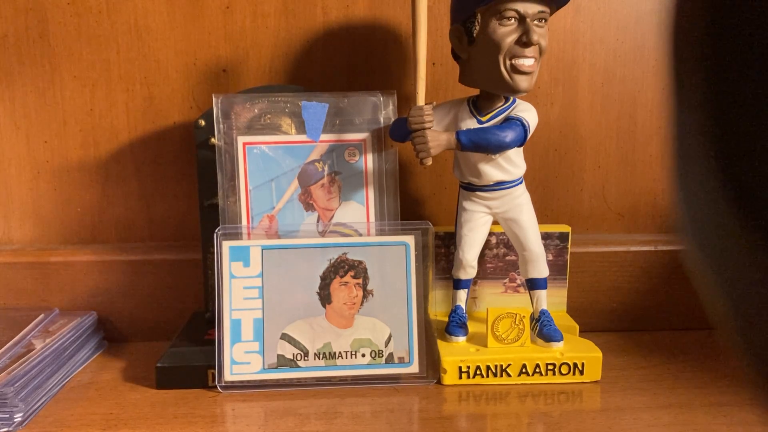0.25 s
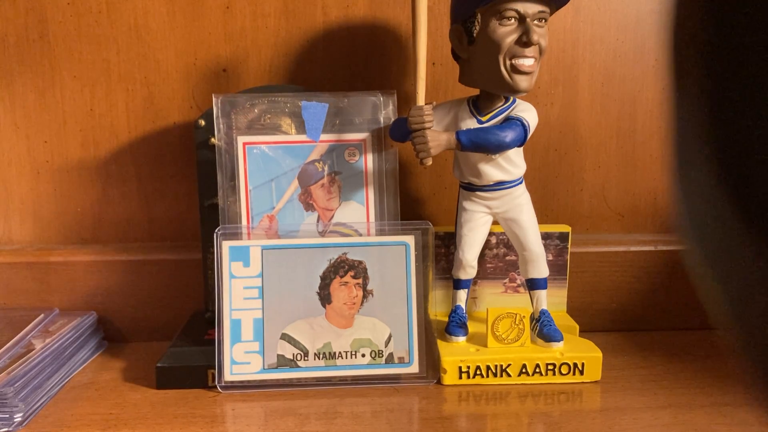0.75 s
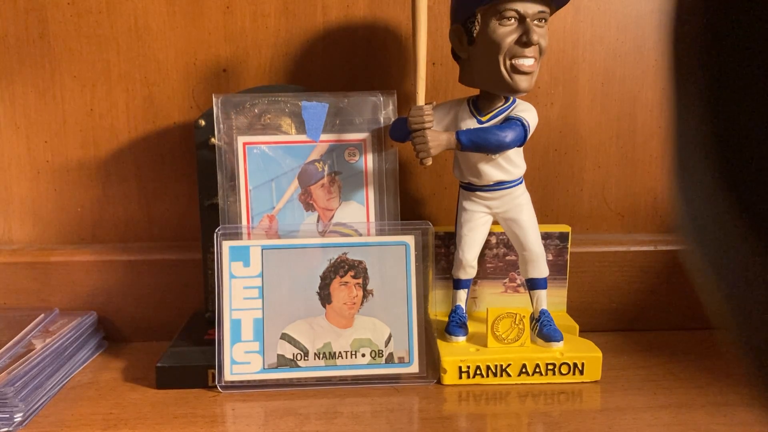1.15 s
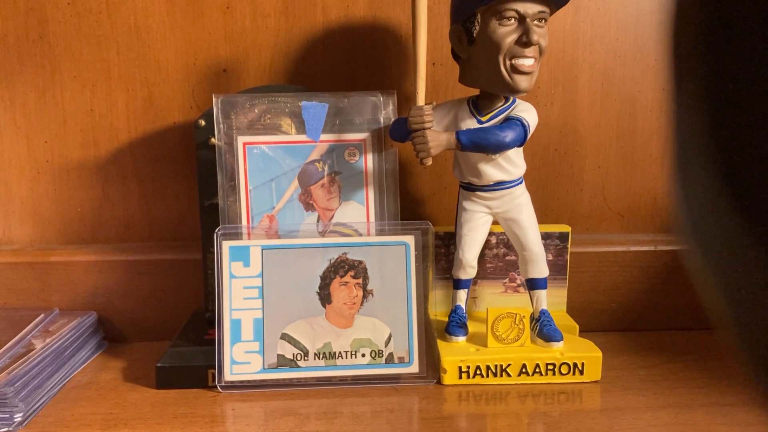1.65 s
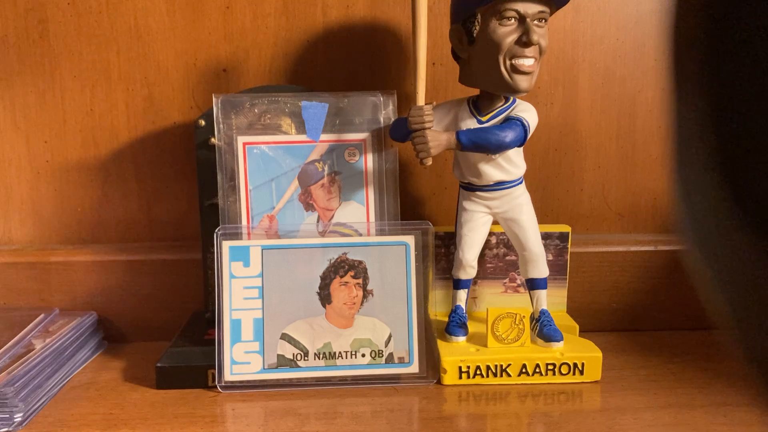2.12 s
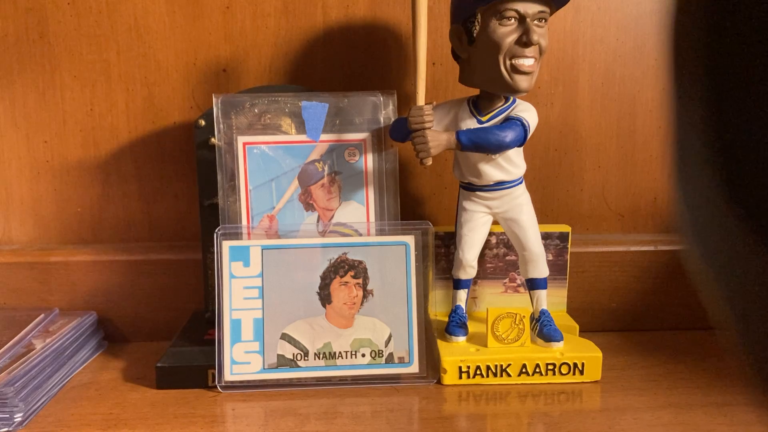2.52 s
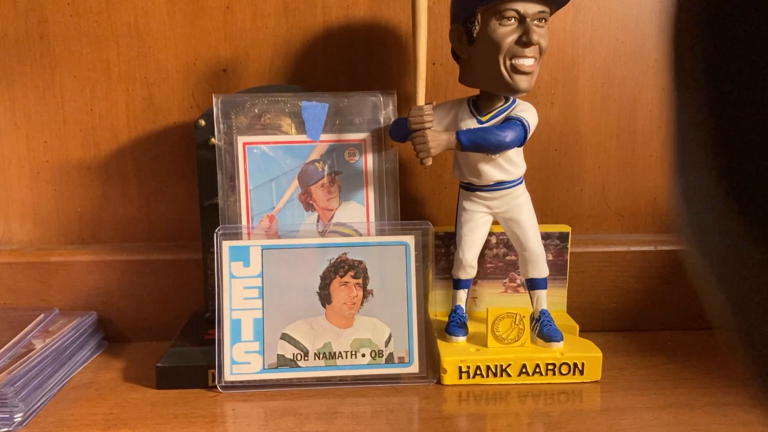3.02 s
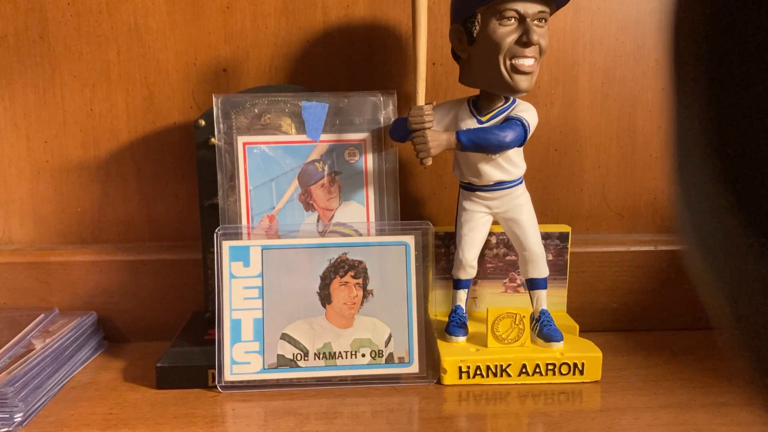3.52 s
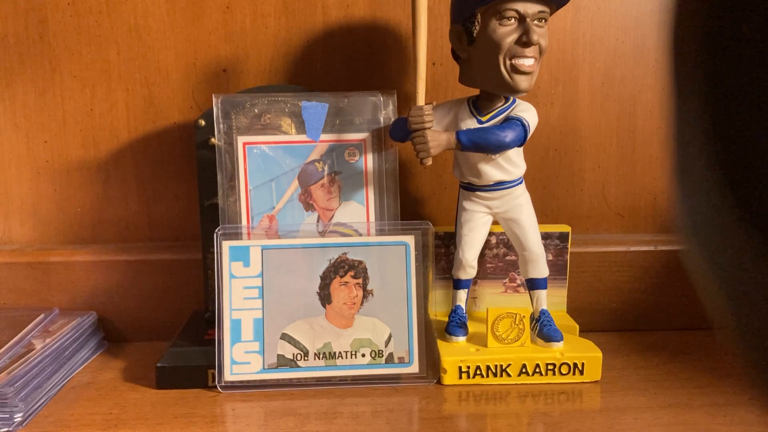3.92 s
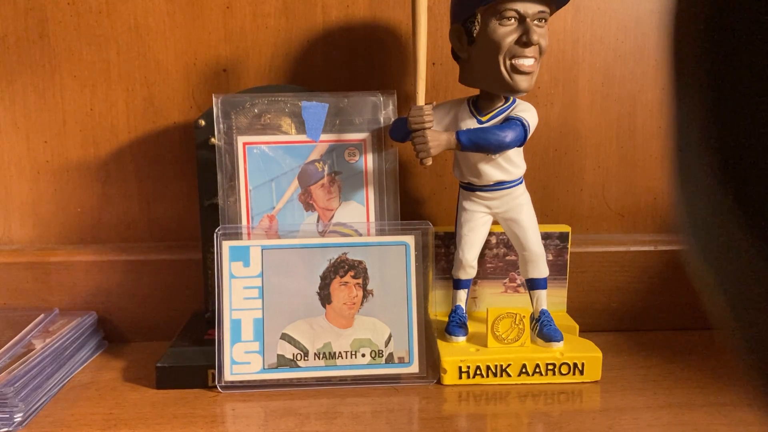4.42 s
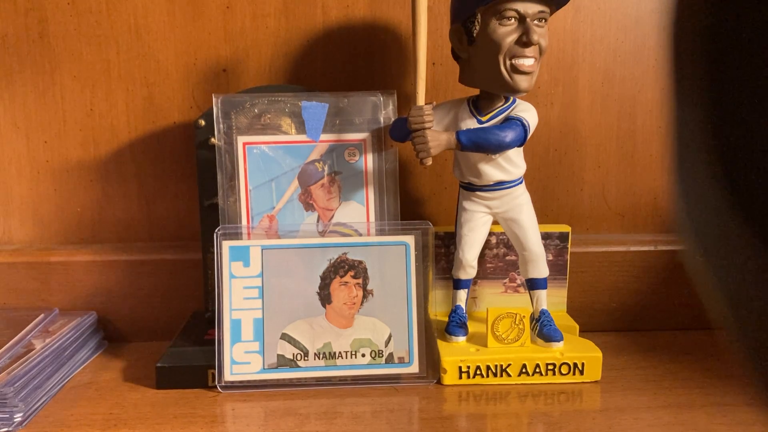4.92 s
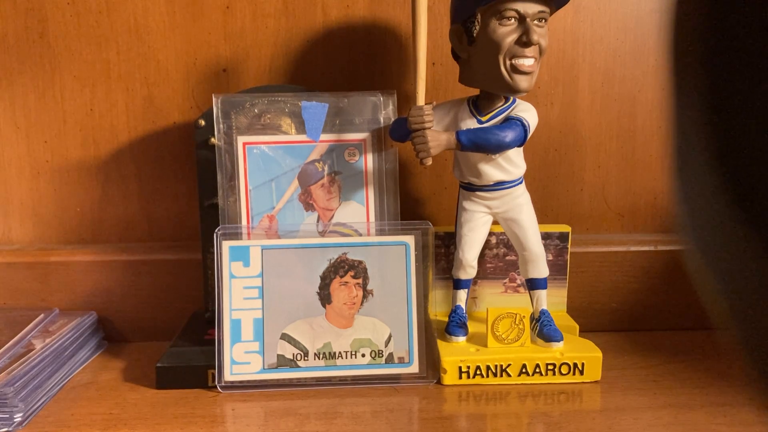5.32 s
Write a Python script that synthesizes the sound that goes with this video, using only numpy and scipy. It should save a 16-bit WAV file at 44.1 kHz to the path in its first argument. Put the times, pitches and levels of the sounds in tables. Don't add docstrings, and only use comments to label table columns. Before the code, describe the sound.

A quiet indoor room with a continuous low ventilation rumble around 50 Hz, uneven soft surges, airy duct rush, light hiss and faint mains hum. Very close to a stereo phone, a card is worked into plastic. From 0 to 0.4 s the film rustles lightly; bright, dry scrapes tighten into the loudest sharp snap at about 0.45 s, followed by hard clicks at 0.63 and 0.68 s and a duller one near 0.9 s. Soft film sliding fades after 1.1 s. A lull holds one light tick and brush around 1.75 s. Two small snaps come at 2.3 s, then a firm push at 2.75-2.85 s: crackling film, clustered clicks and a low holder thump, with rubbing until a tap at 3.14 s. Afterwards there are only faint rubs and ticks, near 3.55, 4.0, 4.3 and 4.6 s, a clear last tap at 4.93 s, a weak one at 5.1 s, and room hum to about 5.6 s.

```python
import sys
import numpy as np
from scipy import signal
from scipy.fft import rfft, irfft, next_fast_len
from scipy.io import wavfile
from scipy.ndimage import map_coordinates

SR = 44100
rng = np.random.default_rng(int(sys.argv[2]) if len(sys.argv) > 2 else 0)


def boost_factor(decibels):
    exponent = np.asarray(decibels, float) / 20
    return 10 ** exponent


def store_wav(level_fs):
    pcm = np.round(np.clip(np.atleast_2d(level_fs), -1, 1) * 32767)
    wavfile.write(sys.argv[1], SR, pcm.T.astype(np.int16))


N = 245545


def filtered(x, response):
    m = next_fast_len(x.shape[-1] + 8192)
    spectrum = rfft(x, m) * response(np.fft.rfftfreq(m, 1 / SR))
    return irfft(spectrum, m)[..., :x.shape[-1]]


def unit(x):
    return x / np.sqrt(np.mean(x ** 2) + 1e-20)


def along(points, hz):
    f, v = np.transpose(points)
    return np.interp(np.log(hz + 1), np.log(f + 1), v)


def resonant(modes):
    def response(f):
        total = 0
        for k, (center, width, db) in enumerate(modes):
            mode = 1j * f * width / (center * center - f * f + 1j * f * width)
            total = total + (-1) ** k * boost_factor(db) * mode
        return total
    return response


def wobble(rate):
    knots = rng.standard_normal(int(N * rate / SR) + 4)
    return map_coordinates(knots, [np.arange(N) * rate / SR])


def noise():
    return rng.standard_normal((2, N))


# (time [s], length [s], low mode level [dB], upper modes level [dB])
SURGES = [(0.016, 0.069, -52, -52.5), (0.256, 0.13, -56, -74), (0.504, 0.11, -57, -66),
          (0.866, 0.13, -53, -53), (1.11, 0.076, -57.5, -60), (1.428, 0.17, -55, -56.5),
          (1.749, 0.035, -53.5, -49.5), (2.106, 0.16, -60.5, -71), (2.577, 0.15, -49.5, -50.5),
          (3.007, 0.073, -48, -60), (3.197, 0.082, -51, -53.5), (3.51, 0.046, -46, -48.5),
          (3.768, 0.13, -60, -49), (3.955, 0.11, -50, -58), (4.238, 0.11, -48.5, -56),
          (4.66, 0.16, -49, -58.5), (4.933, 0.025, -48, -60), (5.126, 0.057, -48.5, -63),
          (5.263, 0.034, -48, -58), (5.53, 0.046, -51.5, -51)]
# (frequency [Hz], width [Hz], level [dB])
UPPER_MODES = [(69.2, 17.5, -5.5), (102.6, 8, 0), (117.55, 8.5, 0.5), (132.9, 22.4, -4)]
# (frequency [Hz], spectral density [dB per Hz])
DUCT = [(88, -37), (150, 1.5), (163, -8), (200, -10.5), (262, -17), (297, -16), (334, -15), (358, -9),
        (436, -21.5), (495, -11), (625, -13.5), (702, -23), (1330, -29.5), (1600, -38), (2400, -45.5),
        (3120, -73), (5280, -120)]
# (frequency [Hz], spectral density [dB per Hz])
HISS = [(1400, -1.5), (3200, -7), (5500, -13), (12600, -16.5), (13600, -28), (14500, -34), (15000, -27),
        (15600, -46)]
# (frequency [Hz], rms level [dB])
HUM = [(120, -54), (360.2, -63)]


def ventilation():
    t = np.arange(N) / SR
    swell = boost_factor([[-64], [-52]])
    for s, length, low_db, upper_db in SURGES:
        swell = swell + boost_factor([[low_db], [upper_db]]) * np.exp(-((t - s) / length) ** 2)
    low = np.sin(2 * np.pi * 51 * t + 0.9 * wobble(6) + [[0], [1]])
    upper = filtered(noise(), lambda f: resonant(UPPER_MODES)(f) * resonant([(110, 110, 0)])(f))
    modes = swell[0] * unit(low) + swell[1] * unit(upper)

    def duct_response(f):
        return boost_factor(along(DUCT, f)) * (1 + 0.13 * np.abs(resonant([(920, 90, 0)])(f)))

    duct = boost_factor(-54.5 + 0.31 * wobble(1.86)) * unit(filtered(noise(), duct_response))
    hiss = unit(filtered(noise(), lambda f: boost_factor(along(HISS, f)) * (f > 700)))
    hiss = boost_factor(-79 + .5 * wobble(3.11)) * hiss
    hum = 0
    for hz, db in HUM:
        hum = hum + boost_factor(db + 4.0 + wobble(4.5)) * np.sin(2 * np.pi * hz * t + .5 * wobble(2.2))
    rumble = boost_factor(-64.5) * unit(filtered(noise(), lambda f: resonant([(44, 14, 0)])(f) ** 2))
    return modes + rumble + duct + hiss + hum * [[1], [-.98]]


# (frequency [Hz], t60 [s])
ROOM = [(300, 1), (2000, 0.42), (6000, 0.22), (14000, 0.2)]


def room(pair):
    step, wet = SR // 5, np.zeros((2, N + SR))
    grains = rng.standard_normal((N // step + 1, 2, SR // 2))
    hz, t, z = signal.stft(grains, SR, nperseg=256)
    tails = signal.istft(z * boost_factor(-60 * t / along(ROOM, hz)[:, None]), SR, nperseg=256)[1]
    for k, tail in enumerate(tails):
        answer = tail / np.linalg.norm(tail[0])
        part = signal.fftconvolve(pair[:, k * step:(k + 1) * step], answer, axes=1)
        wet[:, k * step:k * step + part.shape[1]] += part
    return wet[:, :N]


# (time of most pressure [s], rise [s], fall [s], level [dB], film tone [Hz])
GLIDES = [(.05, .15, 0.14, -79, 4700), (.228, 0.013, 0.082, -57, 5230), (.305, .05, 0.067, -62, 5850),
          (.398, 0.011, 0.013, -46, 4900), (.675, 0.016, 0.0086, -51.5, 4500),
          (.435, 0.019, .02, -53.5, 4540), (1.04, 0.032, 0.11, -60, 4930), (1.11, 0.1, .06, -70, 6000),
          (1.578, 0.059, 0.034, -73, 6350), (1.774, 0.046, .05, -68.5, 3600),
          (2.785, 0.012, 0.1, -51, 6040), (2.938, 0.031, 0.025, -56, 4700), (3.035, 0.016, 0.13, -72, 5240),
          (3.115, 0.13, 0.016, -66.5, 6100)]
# (time of most pressure [s], rise [s], fall [s], level [dB], film tone [Hz])
RUBS = [(.008, 0.044, .1, -76.5, 4000), (.1, 0.17, .2, -78, 4340), (.2, 0.094, 0.071, -76.5, 4360),
        (.35, 0.14, 0.021, -71.5, 4500), (.413, 0.036, 0.014, -58.5, 4480),
        (.898, 0.011, 0.022, -59.5, 4500), (1.44, .04, 0.11, -83.5, 4270), (1.762, 0.047, 0.084, -73, 3820),
        (2.312, .01, 0.027, -78, 4770), (2.86, 0.14, 0.093, -62.5, 4900), (3.18, 0.15, 0.11, -75.5, 4970),
        (3.54, 0.1, 0.077, -78, 3740), (4.275, 0.035, .1, -79, 5200), (4.32, 0.061, 0.016, -83, 4690),
        (4.645, .08, .06, -80.5, 3300), (4.7, .03, .03, -86, 3600), (.69, 0.011, .09, -70.5, 4500)]


def slides():
    t, gains, tones = np.arange(N) / SR, np.zeros((3, N)), np.zeros(N)
    for strokes, body_db, sheen_db in [(GLIDES, -12, -10), (RUBS, 7.5, -9)]:
        for s, rise_s, fall_s, db, hz in strokes:
            distance = np.maximum((s - t) / rise_s, (t - s) / fall_s)
            pressure = boost_factor(np.maximum(db - 21.5 * distance ** 1.21, -200))
            gains += pressure * boost_factor([[0], [body_db], [sheen_db]])
            tones += pressure * hz
    slips = boost_factor(.9 * wobble(60) + 2.2 * wobble(350))
    drive = [gain * unit(slips * boost_factor(0.41 * wobble(90)) * noise()) for gain in gains]
    return np.array(drive), tones / gains[0]


# (time [s], peak level [dB], edge ring [Hz], body level [dB], t60 [s])
SNAPS = [(0.2287, -44.5, 4530, 0, 0.11), (0.3432, -55.5, 3400, 6, 0.098), (0.3875, -63, 5050, -1, 0.015),
         (0.4153, -40, 3080, -3, 0.029), (0.4471, -25.5, 4550, -20, 0.032),
         (0.6275, -28.5, 5370, -6, 0.025), (0.678, -33, 4300, -3.5, 0.016), (0.9038, -46, 7400, 2.5, 0.055),
         (2.2752, -48, 4700, -2.5, 0.17), (2.2981, -38, 4960, -18, 0.064), (2.719, -57, 4630, 5, 0.058),
         (2.7633, -27, 5700, -9.5, 0.15), (2.7747, -33.5, 6540, 1.5, 0.0089),
         (2.801, -33.5, 6300, -10, 0.057), (2.86, -50, 6300, -4, 0.06), (4.3126, -57, 3000, -4, 0.05),
         (4.637, -56.5, 4200, 9, 0.015)]
# (time [s], peak level [dB], edge ring [Hz], body level [dB], t60 [s])
TAPS = [(0.681, -31.5, 7100, -30, 0.041), (0.8111, -68, 3460, 8, 0.068), (0.829, -55.5, 4500, 3, 0.1),
        (0.8925, -50, 3600, -17, 0.039), (1.7584, -52, 3440, -23, 0.036),
        (1.8156, -69.5, 3450, 16.5, 0.031), (2.8376, -53, 5490, 10.5, 0.028), (3.028, -55, 4460, -2, 0.069),
        (3.144, -44.5, 5830, 2.5, 0.026), (3.3036, -81, 3230, 22, 0.17), (4.2588, -54.5, 4700, -4, 0.045),
        (4.926, -41.5, 5860, 0, 0.038), (5.1131, -62, 4200, 2.5, 0.068)]
# (time [s], peak level [dB], edge ring [Hz])
TICKS = [(0.2145, -53, 3210), (0.2495, -61, 7140), (0.7586, -67, 6150), (1.7408, -65.5, 4780),
         (2.318, -59, 4790), (3.5558, -82, 3130), (4.0024, -69.5, 3110), (4.254, -66, 4000),
         (4.2803, -64.5, 4820), (4.6079, -71, 3240), (5.444, -74, 3160), (1.728, -70, 5000)]
# (time [s], peak level [dB], edge ring [Hz])
CRACKLES = [
    (0.391, -45.5, 5000),
    (.6312, -51, 5400),
    (.4512, -44, 7300),
    (2.9035, -51, 9200),
    (4.567, -69.5, 7450),
]


def contacts():
    snaps = [(*row, -6.5) for row in SNAPS]
    taps = [(*row, -19) for row in TAPS]
    ticks = [(*row, 7, 0.093, -13) for row in TICKS]
    crackles = [(*row, 2, 0.018, 8) for row in CRACKLES]
    return snaps + taps + ticks + crackles


# (time [s], thud level [dB], crinkle level [dB], knock frequency [Hz], knock level [dB])
PRESSES = [(.39, -81, -68, 2000, -51), (.415, -51, -67, 1970, -68), (0.4466, -63, -68, 2860, -41.5),
           (.6272, -55.5, -61, 2140, -45), (.68, -44, -72, 2100, -41), (.83, -70, -90, 2050, -61),
           (.893, -56, -80, 2060, -54), (.906, -59, -86, 1910, -44), (.909, -78, -86, 2700, -53),
           (1.744, -78, -99, 1810, -60), (1.76, -64, -99, 1790, -57), (2.278, -91, -67, 2190, -69),
           (2.298, -69, -63, 2150, -55), (2.72, -74, -86, 2140, -58), (2.7657, -50, -41.5, 1770, -59),
           (2.785, -42.5, -53, 1870, -49), (2.827, -47.5, -74, 2000, -44.5), (2.859, -69, -78, 1930, -50),
           (3.144, -50, -96, 1700, -47), (4.927, -58, -99, 2600, -54)]


def clicks():
    drive = np.zeros((5, 2, N + SR))
    edges = np.zeros((2, N + SR))
    t = np.arange(SR // 4) / SR
    after = np.maximum(t - .02, 0)
    rise = np.clip(t / .02, 0, 1) ** 140 + 0.04 * (t / .02) ** 2 * (after == 0)
    reflection = 0.39 * np.exp(-((after - 0.0034) / 0.003) ** 2)

    def ring(db, hz, t60):
        tone = np.sin(2 * np.pi * hz * after + [[0], [1]])
        return boost_factor(db - 60 * after / t60) * tone * (1 - np.exp(-after / .00018))

    def span(s):
        start = round((s - .0195) * SR)
        return slice(start, start + len(t))

    for s, db, hz, body_db, t60, sheen_db in contacts():
        rattle = boost_factor(-60 * after / max(t60, .008))
        snap = 1.06 * boost_factor(-60 * after / 0.002)
        shape = rise * (rattle + snap + reflection)
        levels = boost_factor(db - 11 + np.array([0, body_db, sheen_db]))[:, None, None]
        drive[:3, :, span(s)] += levels * shape * rng.standard_normal((2, len(t)))
        edges[:, span(s)] += ring(db, hz, t60=.004)
    for s, thud_db, crinkle_db, knock_hz, knock_db in PRESSES:
        crinkle = boost_factor(crinkle_db - 60 * after / 0.058) * rise
        drive[4, :, span(s)] += crinkle * rng.standard_normal((2, len(t)))
        push = np.exp(-(after / 0.00032 - 3) ** 2) * (after > 0)
        drive[3, :, span(s)] += boost_factor(thud_db - 5.0) * push
        edges[:, span(s)] += ring(knock_db, knock_hz, t60=.022)
    return drive[..., :N], edges[:, :N]


# (frequency [Hz], width [Hz], level [dB])
FACETS = [(3590, 1290, 1.5), (4870, 1980, -0.5), (6790, 380, -4.5)]


def film(face_drive, tone_hz):
    total = 0
    for mode in FACETS:
        def steep(f):
            return boost_factor(-mode[2]) * resonant([mode])(f) ** 2
        nearness = np.exp(-((tone_hz - mode[0]) / 1900) ** 2)
        total = total + filtered(face_drive * nearness, steep)
    return total


# (frequency [Hz], width [Hz], level [dB])
BODY = [(1160, 1370, -2.5), (1760, 128, 5.5), (2000, 475, 1), (2150, 166, 5.5), (2600, 450, -3)]
FACE = [(3000, 850, -5), (4700, 1970, 9.5), (5070, 3100, -4), (7370, 2700, 10.5)]
SHEEN = [(9240, 600, 0), (10800, 780, -1), (11400, 3200, -4.5), (14900, 900, -12)]
THUD = [(239, 60, 7.5), (357, 47, 9.5), (467, 45, 7), (964, 34, 7)]
CRINKLE = [(14350, 1300, 0), (16300, 740, -2)]


def plastic():
    drive, edges = clicks()
    rub, tone_hz = slides()
    drive[:3] += rub
    for s, _, click_hz, *_ in contacts():
        tone_hz[round((s - .002) * SR):round((s + .015) * SR)] = click_hz
    sound = boost_factor(8) * film(drive[0], tone_hz)
    drive[0] *= boost_factor(-5.5)

    def dull(f):
        return 1 / (1 + 1j * f / 9000) ** 2

    responses = [lambda f: resonant(FACE)(f) * dull(f),
                 lambda f: resonant(BODY)(f) * dull(f),
                 lambda f: resonant(SHEEN)(f) / (1 + 1j * f / 14000) ** 3,
                 resonant(THUD),
                 resonant(CRINKLE)]
    hz = np.linspace(1, SR / 2, num=2000)
    for part, response in zip(drive, responses):
        mean_gain = np.sqrt(np.mean(np.abs(response(hz)) ** 2))
        sound = sound + filtered(part, response) / mean_gain
    return sound, edges


# (frequency [Hz], likeness for near sound [0-1], likeness for room air [0-1],
# right phase [rad], left-right level [dB])
PORTS = [(50, .99, .99, .1, -1.3), (160, .95, .95, 0, -2.3), (280, .7, .72, .9, -1.2),
         (600, .4, .4, -.5, 3), (1100, .3, .1, -2.5, 2.5), (2000, .7, .2, -3.8, -2.5),
         (3300, .7, .25, -8.8, -5), (4100, .65, .2, -11.2, 1.5), (6000, .5, .2, -15.1, -2),
         (7200, .65, .65, -15.7, -1.5), (8400, .97, .97, -15.7, 0), (16000, .97, .97, -15.7, 0)]


def ports(pair, column):
    hz, *cols = np.transpose(PORTS)
    lead_s = 9.8 / 44100

    def alike(f):
        return np.clip(np.interp(f, hz, cols[column]), 0, 1)

    def half(f):
        phase = np.interp(f, hz, cols[2]) + 2 * np.pi * f * lead_s
        return boost_factor(np.interp(f, hz, cols[3]) / 2) * np.exp(-.5j * phase)

    right = filtered(pair[0], alike) + filtered(pair[1], lambda f: np.sqrt(1 - alike(f) ** 2))
    return np.array([filtered(pair[0], half), filtered(right, lambda f: 1 / half(f))])


def scene():
    air = ports(ventilation(), column=1)
    rattle, rings = plastic()
    return air + ports(rattle + rings + boost_factor(-10.5) * room(rattle), column=0)


def top_cut(x):
    return signal.sosfilt(signal.butter(12, 16810, fs=SR, output="sos"), x)


def record(dry):
    mix = filtered(dry, lambda hz: 1 / (1 + (hz / 15850) ** 60))
    return top_cut(mix)


dry = scene()
out = record(dry)
store_wav(out)
```